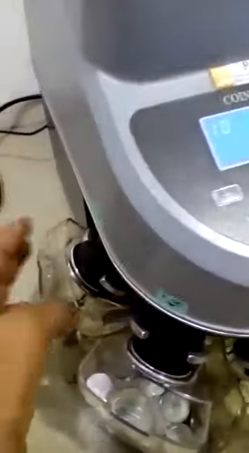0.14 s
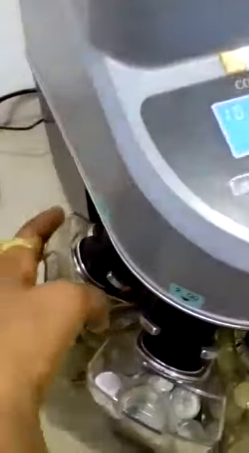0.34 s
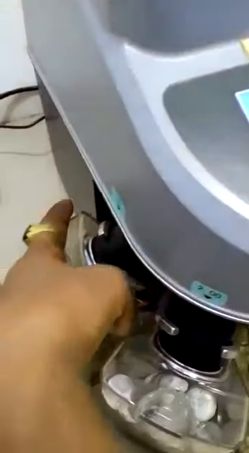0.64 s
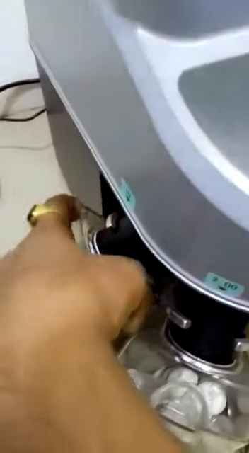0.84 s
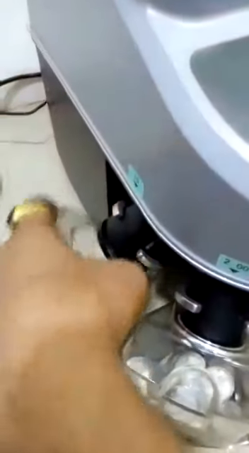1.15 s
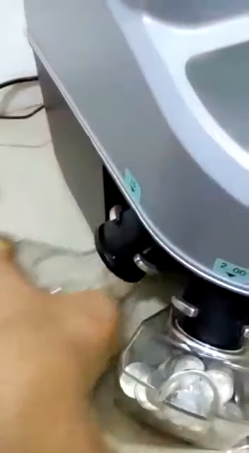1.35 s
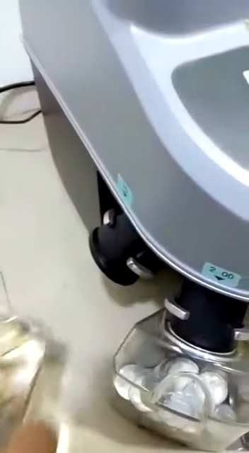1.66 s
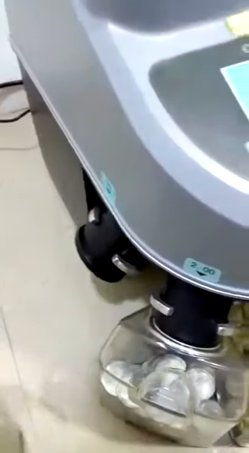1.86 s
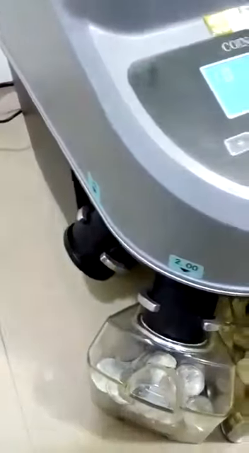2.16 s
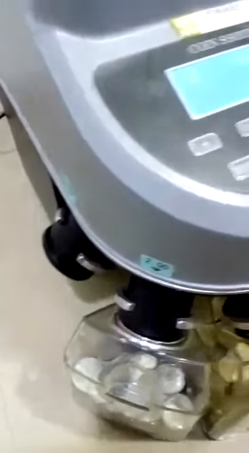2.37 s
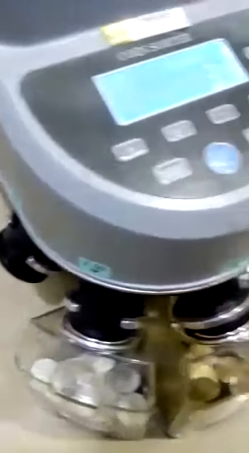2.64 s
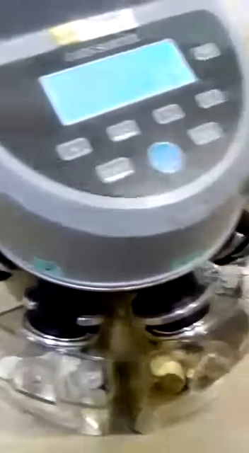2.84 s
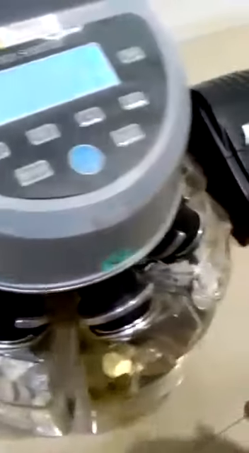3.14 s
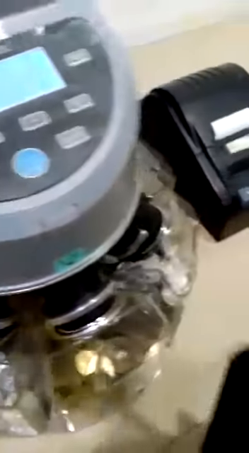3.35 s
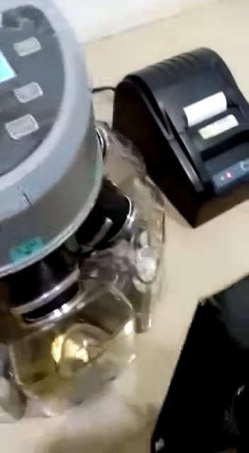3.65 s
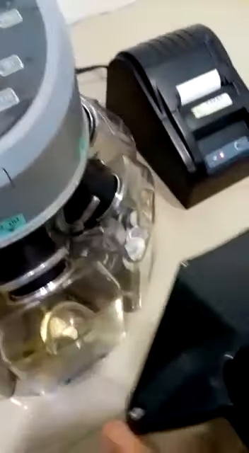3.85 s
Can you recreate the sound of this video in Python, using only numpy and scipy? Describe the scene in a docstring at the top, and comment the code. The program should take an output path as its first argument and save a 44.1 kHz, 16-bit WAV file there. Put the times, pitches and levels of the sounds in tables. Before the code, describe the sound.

Coins clink in a hollow plastic cup: small knocks at about 0.6 s, a faint scrape, then a cluster of knocks and rattling from 1.2 to 1.7 s as it pulls free. Lighter taps follow until a sharp knock at 2.7 s. From 2.9 s to the end coins pour out in uneven, loud, bright clattering bursts, slightly farther off. Small hard room, short echoes, faint hum.

```python
"""A clear plastic cup of coins knocks and scrapes as it is pulled out of a coin sorter in a small hard room,
and a hand taps another cup; then the coins are tipped out in a clatter. Each contact rings three sets of
decaying modes: the hollow body, the clack of the walls, and the coins. Slides and gushes are runs of small
contacts. The sorter's housing, the rim and two deep hollow notes ring modes of their own.
Decaying noise bands make the room's echoes; faint shaped noise and mains hum lie beneath."""
import sys
import numpy as np
from scipy import signal
from scipy.fft import rfft, irfft
from scipy.io import wavfile

SR = 44100
rng = np.random.default_rng(int(sys.argv[2]) if len(sys.argv) > 2 else 0)


def file_out(sig):
    """Save sig as 16-bit WAV at sys.argv[1]."""
    # one column per channel
    cols = np.atleast_2d(sig).T
    # limit, then scale
    lim = np.clip(cols, -1, 1)
    pcm = np.round(lim * 32767).astype(np.int16)
    wavfile.write(sys.argv[1], SR, pcm)


N = 176400

# left-right correlation of room noise and echoes: hz, likeness [-1..1]
ROOM_LIKENESS = [(150,0.8),(500,0.67),(1000,0.58),(2000,0.0081)]

BODY_LIKENESS, TREBLE_LIKENESS = 0.79, 0.019
RISE_S = (0.00036, 0.006, 0.0026)   # onset time constants: body, clack, coin
CONTACT_S = 0.012   # a contact's energy is its level held this long


def from_db(db):
    """Decibels to amplitude gain."""
    return 10 ** (np.asarray(db, float) / 20)


def at_hz(points, hz):
    """Interpolate a table on a log-frequency axis."""
    p = np.array(points)
    return np.interp(np.log(hz), np.log(p[:, 0]), p[:, 1])


def pair(mid, side, likeness):
    """Left and right of given correlation from two unrelated signals."""
    c = np.clip(likeness, -1, 1)
    common = np.sqrt(1 + c) * mid
    opposed = np.sqrt(1 - c) * side
    return np.array([common + opposed, common - opposed]) / np.sqrt(2)


def background():
    """Faint room noise of fixed spectrum, plus a mains-hum sine."""
    floor_rms_db, hum_hz, hum_rms_db = -63.5, 99, -69.5
    # spectrum of the still room: hz, relative level_db
    floor_spectrum = [(15, -60.5), (25, -26), (70, -13.5), (102, -10), (200, -20.5), (301, -22.5),
                      (335, -29), (3520, -35.5), (5880, -36), (14800, -43), (16000, -59)]
    hz = np.maximum(np.arange(N // 2 + 1) * SR / N, 1)
    spectra = pair(*rfft(rng.standard_normal((2, N))), at_hz(ROOM_LIKENESS, hz))
    noise = irfft(spectra * from_db(at_hz(floor_spectrum, hz)), N)
    hum = np.sqrt(2) * np.sin(2 * np.pi * hum_hz * np.arange(N) / SR)
    return from_db(floor_rms_db) * noise / noise.std() + from_db(hum_rms_db) * hum


def room(size=22050):
    """Stereo room response: diffuse echoes as noise bands, each with its own decay time."""
    # reverberation time: hz, t60_s
    room_t60 = [(120,0.16),(300,0.54),(700,0.3),(2000,0.27),(5000,0.32),(13000,.155)]
    # echo colour: hz, level_db
    room_colour = [(150,-9),(600,-2.5),(2000,3),(6000,-2),(13000,2.5)]
    fade_in_mid_s = 0.0051   # echoes fade in from half to one and a half times this
    t = np.arange(size) / SR
    fade_in = np.clip(t / fade_in_mid_s - .5, 0, 1)
    response = 0
    edges_hz = np.geomspace(70, 17000, 13)
    for low, high in zip(edges_hz, edges_hz[1:]):
        hz = np.sqrt(low * high)
        decay = from_db(-60 * t / at_hz(room_t60, hz))
        echoes = rng.standard_normal((2, size)) * decay * fade_in
        sos = signal.butter(3, [low, high], "band", fs=SR, output="sos")
        band = signal.sosfilt(sos, echoes)
        # energy in proportion to bandwidth
        band *= np.sqrt(2 * (high - low) / SR / np.sum(band ** 2, axis=1, keepdims=True))
        response = response + from_db(at_hz(room_colour, hz)) * pair(*band, at_hz(ROOM_LIKENESS, hz))
    return response


def strike(times_s, db, modes, likeness, rise_s, tilt_db=0, size=5000):
    """Each contact rings all the modes, with strengths drawn anew for it."""
    ripple_db, ripples_per_octave = 3.5, .8   # each contact favours other parts of the spectrum
    hz, level_db, t60_s = np.transpose(modes)[:, :, None]
    t = np.arange(size) / SR
    envelope = from_db(level_db - 60 * t / t60_s) * (1 - np.exp(-t / rise_s))
    rings = envelope * np.sin(2 * np.pi * hz * t)

    spot = rng.standard_normal((len(times_s), 2, len(modes) + 1))
    phase_cycles = spot[:, 0, :1]
    strengths = np.sign(spot[:, :, 1:]) * np.abs(spot[:, :, 1:]) ** .5
    octave = np.log2(hz.T)
    ripple = np.sin(2 * np.pi * (ripples_per_octave * octave + phase_cycles))
    colour = from_db(tilt_db * octave + ripple_db * ripple)
    sounds = (pair(strengths[:, 0], strengths[:, 1], likeness) * colour) @ rings

    energy = (sounds ** 2).sum(axis=2).mean(axis=0)
    gains = from_db(db) * np.sqrt(CONTACT_S * SR / energy)
    out = np.zeros((2, N + size))
    starts = np.clip(np.asarray(times_s) * SR, 0, N).astype(int)
    for k, start in enumerate(starts):
        out[:, start:start + size] += gains[k] * sounds[:, k]
    return out[:, :N]


def grains(start_s, length_s, count):
    """Small contacts of uneven timing and size that add up to 0 dB: times, dB."""
    spread_db = 8
    times_s = start_s + length_s * (np.arange(count) + rng.random(count)) / count
    db = spread_db * rng.uniform(-1, 1, count)
    return times_s, db + 10 * np.log10(length_s / CONTACT_S / np.sum(from_db(db) ** 2))


def rattles(rows, trim_db, count):
    """Each stretch of sliding, rubbing or tumbling is a run of small contacts."""
    contacts = []
    for start_s, length_s, *levels_db in rows:
        times_s, db = grains(start_s, length_s, count)
        contacts.append(np.column_stack([times_s, db[:, None] + levels_db + trim_db]))
    return np.vstack(contacts)


def with_rebound(rows, trim_db):
    """A faint soft onset leads each blow; a weaker second touch follows."""
    lead_s, lead_db = 0.0037, -15   # mean lead
    rebound_s, rebound_db = .006, -12.5   # mean delay
    main = np.array(rows) + [0, *trim_db]
    spacing = rng.uniform(.5, 1.5, (len(main), 2))
    lead = np.column_stack([main[:, 0] - lead_s * spacing[:, 0], main[:, 1:] + lead_db])
    rebound = np.column_stack([main[:, 0] + rebound_s * spacing[:, 1], main[:, 1:] + rebound_db])
    return np.vstack([lead, main, rebound])


def dense_modes(spectrum, median_t60_s, count):
    """Many unevenly spaced modes, some ringing longer and starting weaker than others."""
    t60_spread = 0.19   # natural-log standard deviation
    low_hz, high_hz = spectrum[0][0], spectrum[-1][0]
    hz = low_hz + (high_hz - low_hz) * (np.arange(count) + rng.random(count)) / count
    stretch = np.exp(t60_spread * rng.standard_normal(count))
    level_db = at_hz(spectrum, hz) - 10 * np.log10(stretch)
    return np.column_stack([hz, level_db, median_t60_s * stretch])


def heap():
    """Modes of the cup body, walls and one heap of coins; body modes stay, the rest are drawn anew."""
    # hollow body of the cup: hz, relative level_db, t60_s
    body_modes = [(389,-11,0.035),(439.5,-16,0.12),(484,0.5,0.081),(494,1,0.074),(541.5,-3,0.0782),(574,4.5,0.067),(639,0.5,0.058),(655,3,0.049),(696.4,-3,0.049),(769,-1.5,0.042),(853.6,2.5,0.048),(927,-2,0.051),(1021,-4,0.045),(1144.5,-1,0.038)]
    # strength of the packed wall modes: hz, relative level_db
    clack_spectrum = [(1300,9),(1480,1),(1650,5),(1830,6.5),(2000,0.5),(2270,7),(2500,-0.5),(2730,2),(3100,-2),(4000,-2.5),(5000,-4),(6300,-8.5),(8000,-14.5)]
    # strength of the packed coin modes: hz, relative level_db
    coin_spectrum = [(6000,-8),(8000,-2),(8600,7.5),(9100,8.5),(9800,6),(11000,1.5),(12800,-4.5),(14200,-0.5),(15200,-2.5),(15800,-26)]
    clack_modes = dense_modes(clack_spectrum, 0.02, count=90)
    coin_modes = dense_modes(coin_spectrum, 0.024, count=70)
    return body_modes, clack_modes, coin_modes


def sound_contacts(contacts, pan, low_hz, count=6):
    """Contacts ring cup and coins, shared among heaps; a high-pass keeps them free of low thud."""
    # dB per octave per dB of coin-to-clack level (soft blows sound dull): body, clack, coin
    soft_tilt = (0.068, 0.49, 0.37)
    neutral_gap_db = 16   # coin level below clack level at which the tilt is zero
    likeness = BODY_LIKENESS, TREBLE_LIKENESS, TREBLE_LIKENESS
    hardness_db = contacts[:, 3:] - contacts[:, 2:3] + neutral_gap_db
    out = np.zeros((2, N))
    for i in range(count):
        share = contacts[i::count]
        for k, modes in enumerate(heap()):
            tilt_db = soft_tilt[k] * hardness_db[i::count]
            out += strike(share[:, 0], share[:, k + 1], modes, likeness[k], RISE_S[k], tilt_db)
    out = signal.sosfilt(signal.butter(5, low_hz, "high", fs=SR, output="sos"), out + 1e-18)
    pan_db = at_hz(pan, np.maximum(np.arange(N + 1) * SR / (2 * N), 1))
    pan_gains = np.sqrt(2 / (1 + from_db([-pan_db, pan_db]) ** 2))
    return irfft(rfft(out, 2 * N) * pan_gains)[:, :N]


def housing():
    """Dull thumps and low rubbing ring the low modes of the sorter's shell."""
    # shell modes: hz, relative level_db, t60_s
    housing_modes = [(109,-8,0.165),(138.3,4,0.089),(178,2,0.062),(229,6.5,0.047),(327,1.5,0.067)]
    # cup bumps the housing: start_s, level_db before trim
    bumps = [(0.611, -52.5), (1.166, -53), (1.276, -43), (1.295, -43), (1.462, -39), (1.475, -63),
             (1.525, -45), (1.547, -46), (2.701, -58), (3.689, -57)]
    # cup rubs along the housing: start_s, length_s, level_db
    rubs = [(0.609,0.094,-60),(1.17,0.11,-51.5),(1.33,0.13,-60),(1.471,0.14,-48),(3.83,0.16,-58.5)]
    bump_trim_db = 5
    rub_tilt_db = 1.5   # per octave: rubbing favours the shell's higher modes
    times_s, db = np.transpose(bumps)
    thumps = strike(times_s, db + bump_trim_db, housing_modes, 0.95, rise_s=0.0028, size=10000)
    times_s, db = rattles(rubs, 0, count=10).T
    rubbing = strike(times_s, db, housing_modes, 0.83, rise_s=0.004, tilt_db=rub_tilt_db, size=10000)
    return thumps + rubbing


def rim():
    """A few modes give a short bright note from the cup's rim."""
    # rim modes: hz, relative level_db, t60_s
    rim_modes = [(2204,7.5,0.046),(2310,7.5,0.027),(2550,-14,0.045)]
    # cup is struck where its rim sings: start_s, level_db before trim
    rim_strikes = [(0.86,-62),(0.99,-62),(1.715,-40.5),(2.513,-36),(2.385,-47),(2.915,-26.5),(3.897,-20),(3.905,-20),(3.942,-18),(3.979,-21)]
    trim_db, left_right_db = -6.5, [[-2], [1.5]]
    times_s, db = np.transpose(rim_strikes)
    return strike(times_s, db + trim_db, rim_modes, 1.0, rise_s=0.0015) * from_db(left_right_db)


def hollow():
    """Two blows late in the pour ring a deeper hollow note."""
    # deep hollow modes: hz, relative level_db, t60_s
    deep_modes = [(348, -5, 0.075), (418.6, 0, 0.084)]
    # deep blows: start_s, level_db
    deep_blows = [(3.863, -28), (3.925, -34.5)]
    times_s, db = np.transpose(deep_blows)
    return strike(times_s, db, deep_modes, BODY_LIKENESS, RISE_S[1])


def pour():
    """Clumps of coins land amid gushes of single coins, each a contact ringing cup and coins."""
    # clumps land: start_s, body_db, clack_db, coin_db before trim
    drops = [(2.858, -47.5, -38, -49), (2.874, -25, -25, -37.5), (2.914, -25.5, -26, -37.5),
             (2.997, -28, -31, -43), (3.023, -22.5, -22.5, -24), (3.032, -22.5, -22.5, -37),
             (3.045, -29.5, -23.5, -27), (3.073, -24.5, -22, -24), (3.083, -50, -21.5, -32),
             (3.136, -22.5, -20, -34), (3.153, -28.5, -24.5, -33), (3.191, -28.5, -25, -43),
             (3.32, -36.5, -32.5, -41), (3.348, -28.5, -25, -39), (3.371, -62, -42, -45),
             (3.463, -26, -23, -28.5), (3.494, -30, -25, -35.5), (3.505, -30, -34, -46),
             (3.529, -25.5, -23, -29.5), (3.565, -27, -19, -29), (3.618, -25.5, -18.5, -30),
             (3.689, -43, -27.5, -47), (3.757, -29.5, -22, -35), (3.769, -27.5, -28, -35),
             (3.785, -31.5, -19, -24.5), (3.831, -27, -22.5, -34), (3.843, -50, -20.5, -26.5),
             (3.869, -27.5, -19, -35), (3.904, -55, -24.5, -24), (3.941, -29, -34, -39),
             (3.978, -30, -26.5, -34), (3.986, -50, -23.5, -33)]
    # coins leave the cup: start_s, length_s, body_db, clack_db, coin_db before trim
    gushes = [(2.88,0.05,-39.5,-35,-40.5),(2.96,0.072,-48,-41,-47),(3.028,0.053,-37,-40,-30),(3.095,0.12,-36,-30,-33.5),(3.215,0.1,-58,-44,-51.5),(3.355,0.083,-40.5,-39.5,-43),(3.475,0.093,-46,-36,-39.5),(3.57,0.085,-32,-26.5,-28),(3.655,0.0714,-35,-30,-31.5),(3.79,0.056,-37.5,-25.5,-32.5),(3.85,0.16,-33,-26,-30)]
    # left minus right: hz, level_db
    pour_pan = [(350,-0.5),(600,-1),(1300,1.5),(2600,-2.5),(6400,-4.5),(9500,-6),(14500,0.5)]
    drop_trim_db, gush_trim_db = (-3.5, -3, -3), (-0.5, -2.5, -3)   # body, clack, coin
    clumps = with_rebound(drops, drop_trim_db)
    single_coins = rattles(gushes, gush_trim_db, count=13)
    return sound_contacts(np.vstack([clumps, single_coins]), pour_pan, low_hz=280)


def cup():
    """The cup is worked loose, then a hand taps another cup: knocks, taps, and drags."""
    # knocks and taps on cups: start_s, body_db, clack_db, coin_db before trim
    knocks = [(0.559, -41.5, -53.5, -60), (0.588, -31.5, -35.5, -44), (0.605, -32, -38, -60.5),
              (1.002, -54.5, -71, -101.5), (1.092, -37.5, -58, -88), (1.164, -37.5, -46.5, -42.5),
              (1.23, -38.5, -50, -72), (1.262, -32, -41, -61), (1.273, -21.5, -26.5, -39),
              (1.293, -29.5, -36, -27.5), (1.321, -56, -58, -57), (1.461, -24.5, -34, -44),
              (1.476, -48, -35, -24), (1.521, -24, -33, -38.5), (1.547, -23.5, -26.5, -31.5),
              (1.562, -26.5, -26.5, -34.5), (1.587, -33, -26.5, -49), (1.603, -27.5, -28, -28.5),
              (1.621, -28, -27, -42), (1.677, -43, -31, -29), (1.801, -74, -44.5, -43.5),
              (1.815, -29, -36.5, -42), (1.843, -35.5, -34, -36), (1.927, -43, -41.5, -41.5),
              (2.021, -46, -51, -79), (2.083, -35, -41.5, -64), (2.106, -33, -33, -52),
              (2.287, -54.5, -57, -54), (2.316, -50.5, -40.5, -60.5), (2.384, -62, -43.5, -67),
              (2.513, -27.5, -31, -47), (2.635, -62, -42.5, -38.5), (2.696, -19, -26, -33.5),
              (2.704, -27, -28, -32.5), (2.716, -30, -29.5, -28.5)]
    # cup drags, coins slide in it: start_s, length_s, body_db, clack_db, coin_db before trim
    slides = [(0.578,0.039,-44,-37,-55),(0.76,0.16,-63.5,-68,-101),(1.10,0.15,-47,-52,-74),(1.279,0.023,-38,-25.5,-30.5),(1.33,0.13,-47,-49.5,-80),(1.467,0.02,-36,-27,-35),(1.53,0.097,-33,-36,-58),(1.64,0.11,-60,-46,-63),(1.76,0.12,-87,-44,-52),(2.32,0.21,-62,-54.5,-81),(2.53,0.15,-57.5,-51,-71)]
    # left minus right: hz, level_db
    cup_pan = [(350,-0.5),(600,-1),(1300,2),(3000,-3.5),(6000,-5.5),(9500,-8),(15000,-3)]
    knock_trim_db, slide_trim_db = (-2, -1, -3.5), (-1.5, -6.5, -0.5)   # body, clack, coin
    blows = with_rebound(knocks, knock_trim_db)
    drags = rattles(slides, slide_trim_db, count=18)
    return sound_contacts(np.vstack([blows, drags]), cup_pan, low_hz=348)


def scene():
    """The cups are handled close by; the pour is a little farther off, with more echo."""
    near_echo_db, far_echo_db = -5, -1
    near = cup() + housing()
    far = pour() + rim() + hollow()
    send = from_db(near_echo_db) * near + from_db(far_echo_db) * far
    echoes = signal.fftconvolve(send, room(), axes=1)[:, :N]
    return near + far + echoes + background()


def record(dry):
    """A steep elliptic low-pass cuts the top."""
    cutoff_hz = 15500
    return signal.sosfilt(signal.ellip(10, .1, 80, cutoff_hz, fs=SR, output="sos"), dry)


dry = scene()
out = record(dry)
file_out(out)
```